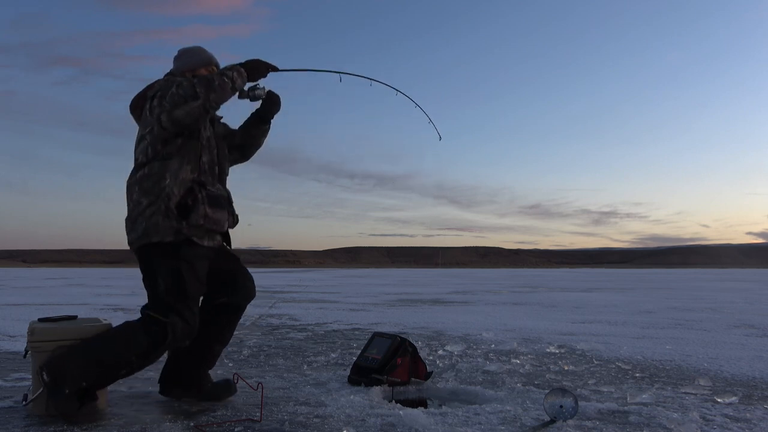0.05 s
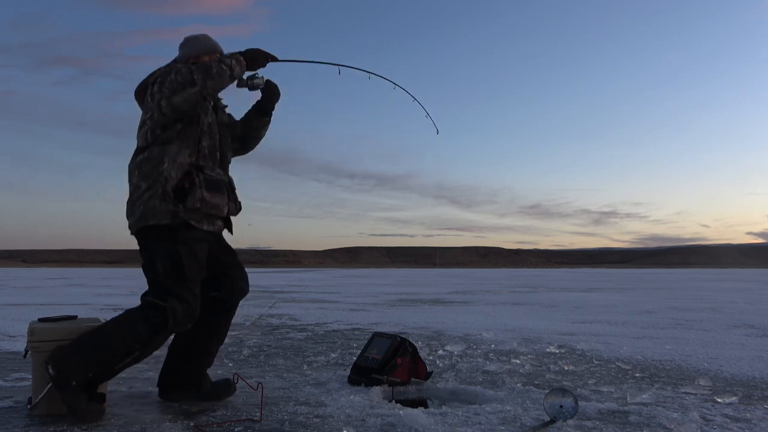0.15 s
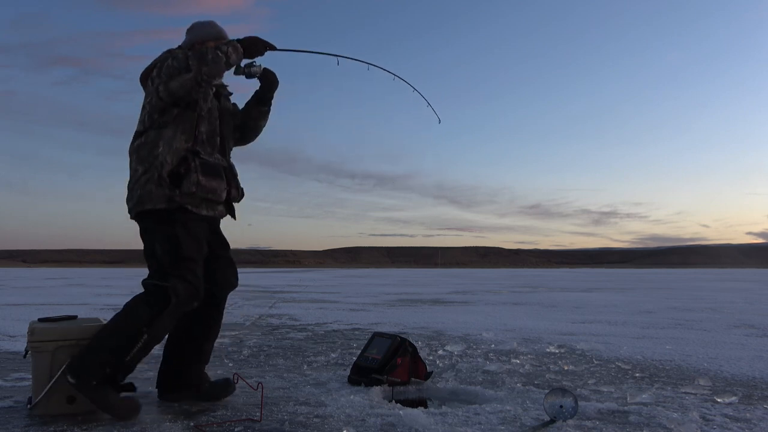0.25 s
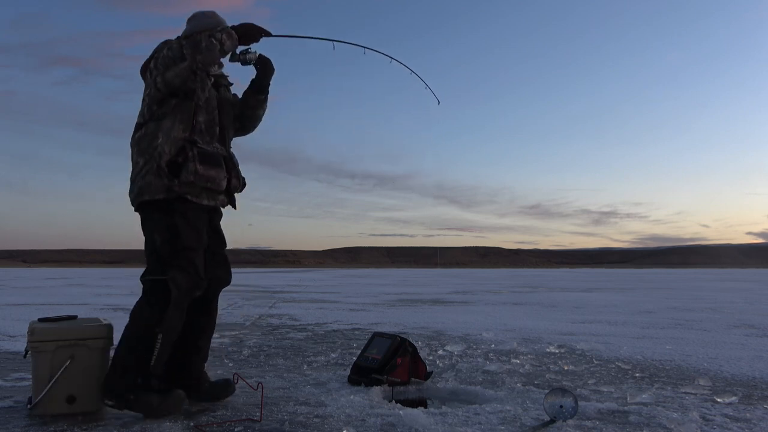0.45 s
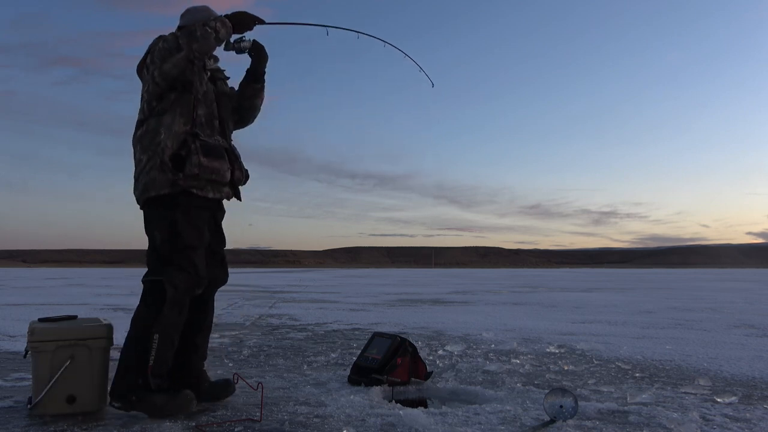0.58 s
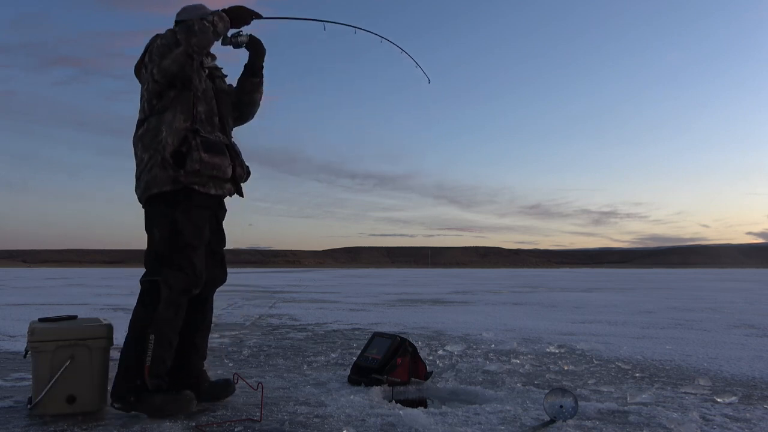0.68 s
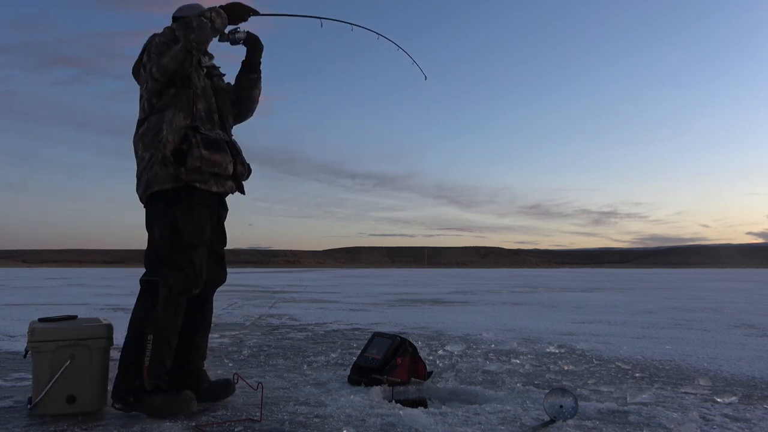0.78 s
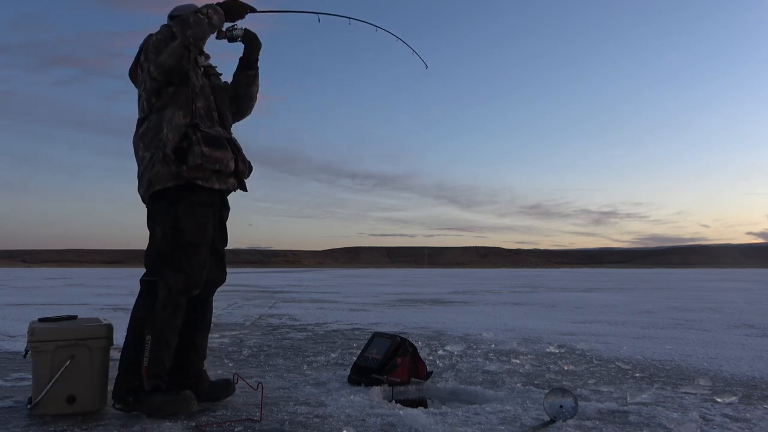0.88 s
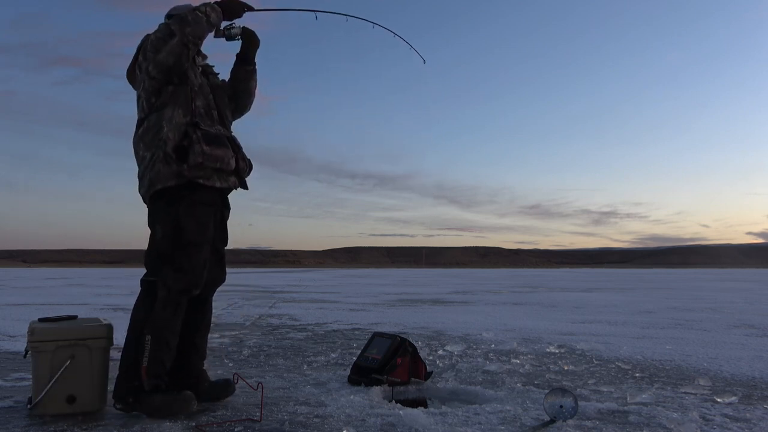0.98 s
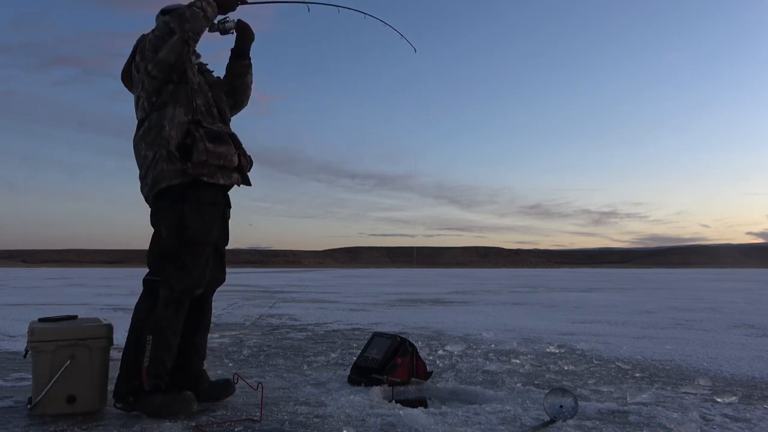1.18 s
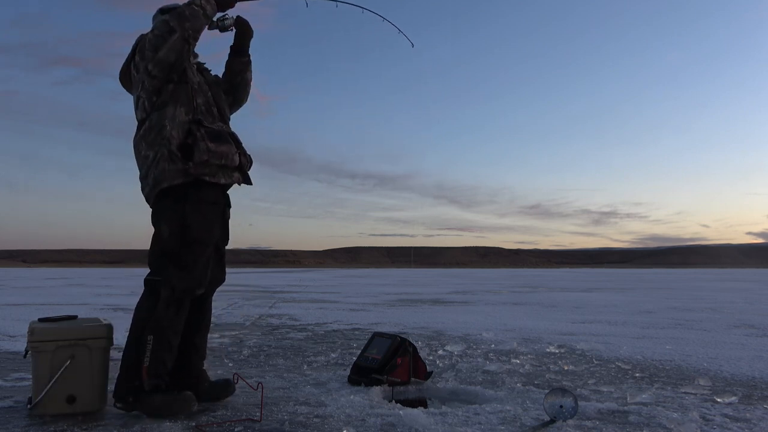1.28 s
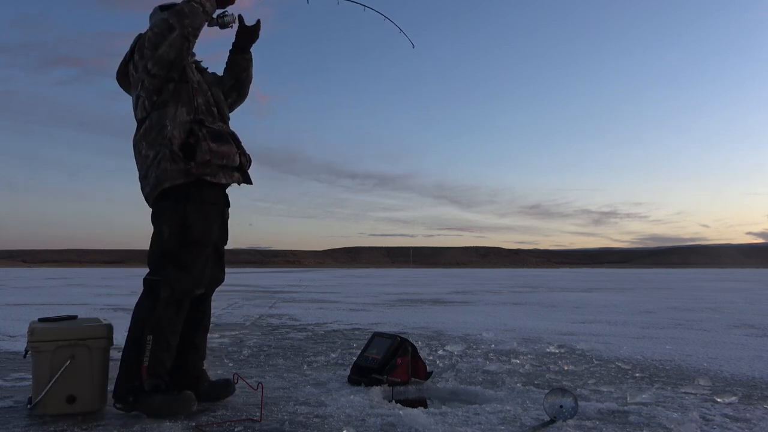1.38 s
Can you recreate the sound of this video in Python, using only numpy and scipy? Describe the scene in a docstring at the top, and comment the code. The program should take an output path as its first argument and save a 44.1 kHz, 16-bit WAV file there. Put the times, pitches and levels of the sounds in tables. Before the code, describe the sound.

Two quick boot knocks hit ice and a hollow plastic bucket as someone stands up on a frozen lake. The sole scrapes and ice crumbs snap, then the rustle of heavy clothes fades, leaving faint tackle ticks and low wind.

```python
"""Low wind and a far drone lie over a frozen lake. An angler in heavy clothes stands up: his boot drags
in quick slips, then knocks twice, on the ice and on a hollow plastic bucket that rings and judders after
each knock. A faint low boom swells from the first knock and dies slowly. The boot scuffs into place and
ice crumbs snap; clothing rustles, and the tackle ticks and squeaks faintly as the rubbing fades."""
import sys
import numpy as np
from scipy import signal
from scipy.fft import rfft, irfft
from scipy.io import wavfile
from scipy.ndimage import uniform_filter1d

SR = 44100
rng = np.random.default_rng(int(sys.argv[2]) if len(sys.argv) > 2 else 0)


def wav_out(sig):
    """Save sig, one row per channel (or a flat mono array), as 16-bit PCM at SR to the path in sys.argv[1]."""
    wavfile.write(sys.argv[1], SR, np.round(np.clip(np.atleast_2d(sig).T, -1, 1) * 32767).astype(np.int16))


N = 63945
T = np.arange(N) / SR

# wind spectrum (frequency [Hz], density [dB])
WIND_SPECTRUM = [(20, 0.5), (40, 4), (130, -2), (230, -6.5), (400, -9), (600, -9.5), (950, -14.5),
                 (1300, -15.5), (2200, -26.5), (4500, -28), (6000, -33), (16000, -39)]
# far drone (centre [Hz], half-width [Hz], level [dB])
DRONE_BANDS = [(113, 15.4, -46.5), (150, 25, -45.5), (580, 57, -44.5), (876, 35, -49.5)]
# metallic ticks of the tackle (time [s], level [dB], pitch [Hz])
TACKLE_TICKS = [(.247, -47.5, 4650), (0.266, -44, 4690), (.596, -40, 4620), (0.656, -49, 4450),
                (0.933, -43, 4350), (1.1295, -42.5, 4420), (1.402, -44, 4400)]
# squeaks of the tackle (time [s], level [dB], length [s])
TACKLE_SQUEAKS = [(0.575, -51, 0.012), (.936, -51, .013), (0.966, -52, 0.011), (1.005, -48, 0.0055)]
# sole and cloth rubbing (time [s], level [dB])
SCUFF_ENVELOPE = [(0, -41.5), (.09, -42), (.125, -35.5), (.26, -33.5), (.31, -30.5), (.39, -31.5),
                  (.5, -31), (.55, -37.5), (.6, -48.5), (.72, -47.5), (.85, -55.5), (1.03, -49),
                  (1.15, -68), (1.45, -50.5)]
# sole and cloth rubbing (frequency [Hz], density [dB])
SCUFF_SPECTRUM = [(100, -5.5), (250, 2.5), (330, 3), (700, 1), (1500, -1.5), (2400, -2.5), (2900, -9.5),
                  (4100, -9.5), (5700, -29.5), (8300, -22.5), (11000, -33.5), (16000, -49)]
# hiss of frost and stiff fabric (time [s], level [dB])
HISS_ENVELOPE = [(0, -49), (.12, -46.5), (.25, -55), (.318, -60), (.328, -41), (.385, -36), (.42, -41.5),
                 (.47, -38.5), (.6, -58.5), (.8, -56), (.88, -71), (1.22, -62), (1.265, -54.5),
                 (1.305, -53), (1.34, -69), (1.45, -55)]
# hiss of frost and stiff fabric (frequency [Hz], density [dB])
HISS_SPECTRUM = [(1500, 5.5), (4200, 9.5), (5800, -2.5), (7200, 2.5), (8500, 0), (10500, -5), (13000, -12),
                 (16000, -21)]
# ice crumbs under the sole (time [s], crunch [dB], fizz [dB])
CRUMB_SNAPS = [(0.1036, -8.5, -17), (.205, -8.5, -28), (0.3709, -3.5, -16), (0.4694, -5, -30),
               (0.4722, -5.5, -19), (0.4782, -14, -16), (0.787, -23.5, -52), (1.0552, -16, -42),
               (1.083, -25, -49)]
# boot and bucket rocking and settling (time [s], level [dB], pitch [Hz])
ROCKING_THUDS = [(0.2095, -9, 530), (0.2138, -6.5, 466), (0.2239, -6, 441), (0.2351, -9, 446),
                 (0.2435, -16, 474), (0.2802, -29.5, 414), (0.2928, 0, 461), (0.3016, -9.5, 470),
                 (0.3102, -3.5, 370), (0.319, -9.5, 310), (0.3305, -13.5, 406), (0.3368, -7, 419),
                 (0.3495, -8.5, 422), (0.408, -20, 400), (0.4225, -23, 432), (0.784, -35, 414),
                 (1.0281, -30, 333)]
# bucket modes (frequency [Hz], level [dB], t60 [s])
BUCKET_MODES = [(313, -7, 0.27), (332.1, 1, 0.28), (424.2, 2.5, 0.26), (458.4, -1, 0.39), (495, -3, 0.3),
                (673.3, 4, 0.12), (806.7, -1, 0.24), (1076, -7, 0.14), (1320, -13, 0.31),
                (1448, 0.5, 0.043), (1970, -37, 0.077), (2260, -24, 0.059)]
# hard contact of the boot (frequency [Hz], density [dB])
CRACK_SPECTRUM = [(150, -61), (500, -36), (650, 2), (1050, 4.5), (1260, -9), (1500, 1.5), (1680, -8),
                  (2100, -2.5), (2600, -5), (2820, -32), (3200, -7.5), (3650, -22.5), (4200, -8.5),
                  (4550, -34), (4900, -12), (6100, -32.5), (8300, -17.5), (10200, -32), (16000, -59)]
# knocks and rebounds (time [s], crack [dB], ring [dB], clatter [dB], clatter t60 [s], crack cutoff [Hz])
BOOT_KNOCKS = [(0.212, 12.5, -22, 9, 0.025, 17000), (0.2177, -12, -28, 9, 0.044, 7600),
               (.2958, 4.5, -17, 12.5, 0.047, 8900), (0.3165, 1.5, -33.5, -1, 0.032, 3360),
               (.339, 1, -29.5, -15.5, 0.16, 2470)]


def amp(db):
    """Decibels to gain."""
    return 10 ** (np.asarray(db) / 20)


def unit(x):
    """Scales to rms 1."""
    return x / np.sqrt(np.mean(x ** 2) + 1e-20)


def colour(spectrum, hz):
    """Gain of a spectrum table at hz."""
    table_hz, db = np.transpose(spectrum)
    return amp(np.interp(np.log(hz + 1), np.log(table_hz + 1), db))


def level(envelope):
    """Gain of an envelope table per sample."""
    return amp(np.interp(T, *np.transpose(envelope)))


def add(mix, time_s, sound):
    """Mixes a sound in at time_s."""
    part = mix[max(round(time_s * SR), 0):][:len(sound)]
    part += sound[:len(part)]


def cut(x, hz, kind="low", order=2):
    """Butterworth low-pass or high-pass."""
    return signal.sosfilt(signal.butter(order, hz, kind, fs=SR, output="sos"), x)


def band(centre_hz, half_width_hz):
    """Narrow-band noise, rms 1."""
    hz = np.fft.rfftfreq(N, 1 / SR)
    return unit(irfft(rfft(rng.standard_normal(N)) / (1 + ((hz - centre_hz) / half_width_hz) ** 2), N))


def click(spectrum, size=2048):
    """Minimum-phase click, energy 1."""
    log_gain = np.log(colour(spectrum, abs(np.fft.fftfreq(size, 1 / SR))))
    pulse = np.fft.ifft(np.exp(np.conj(signal.hilbert(log_gain)))).real
    return pulse / np.linalg.norm(pulse)


def burst(t60_s, size=8192):
    """Decaying noise, energy 1."""
    x = rng.standard_normal(size) * np.exp(-np.log(1000) * T[:size] / t60_s)
    return x / np.linalg.norm(x)


def friction(spectrum, grains_per_s=1400, grain_share=.36, spread_db=2, patch_db=3, flicker_db=.5):
    """Tiny slips over fine noise, coloured, with drifting spectral patches; rms 1."""
    grains = rng.standard_normal(N) * (rng.random(N) < grains_per_s / SR)
    grains *= amp(spread_db * np.minimum(rng.exponential(1, N), 3))
    rub = np.sqrt(grain_share) * unit(grains) + np.sqrt(1 - grain_share) * rng.standard_normal(N)
    hz, _, frames = signal.stft(rub, SR, nperseg=256)
    patches = uniform_filter1d(rng.standard_normal(frames.shape), size=8, axis=0)
    patches = unit(uniform_filter1d(patches, size=3, axis=1))
    flicker = rng.standard_normal(frames.shape[1])
    frames *= colour(spectrum, hz)[:, None] * amp(patch_db * patches - flicker_db * flicker)
    return unit(signal.istft(frames, SR, nperseg=256)[1][:N])


def wind(level_db=-42):
    """Low wind over the lake: steady coloured noise."""
    gain = colour(WIND_SPECTRUM, np.fft.rfftfreq(N, 1 / SR))
    return amp(level_db) * unit(irfft(rfft(rng.standard_normal(N)) * gain, N))


def drone():
    """Far drone: fuzzy noise bands."""
    return sum(amp(db) * band(hz, half_width_hz) for hz, half_width_hz, db in DRONE_BANDS)


def boom(level_db=-35, rise_s=.029, t60_s=2.73):
    """A faint low boom swells from the first knock and dies slowly."""
    age_s = np.maximum(T - BOOT_KNOCKS[0][0], 0)
    envelope = amp(level_db - 60 * age_s / t60_s) * np.minimum(age_s / rise_s, 1)
    return envelope * band(centre_hz=177.7, half_width_hz=24.7)


def tackle(rise_s=.0015, glide_depth=.07, settle_s=.0015, squeak_hz=6580, ramp_s=.002):
    """Metal tackle ticks in rough upward chirps and gives brief, cleaner squeaks."""
    out, t = np.zeros(N), T[:SR // 50]
    envelope = np.sqrt(t / rise_s) * np.exp((1 - t / rise_s) / 2)
    glide = 1 - glide_depth * np.exp(-t / settle_s)
    for time_s, db, hz in TACKLE_TICKS:
        chirp = np.sin(2 * np.pi * np.cumsum(hz * glide) / SR)
        roughness = .55 * band(hz, half_width_hz=300)[:len(t)]
        add(out, time_s, amp(db) * envelope * (chirp + roughness))
    for time_s, db, length_s in TACKLE_SQUEAKS:
        gate = np.clip(np.minimum(t, length_s - t) / ramp_s, 0, 1)
        roughness = .2 * band(squeak_hz, half_width_hz=200)[:len(t)]
        add(out, time_s, amp(db) * gate * (np.sin(2 * np.pi * squeak_hz * t) + roughness))
    return out


def scuffing():
    """Sole and clothing rub; ice crumbs snap."""
    out = level(SCUFF_ENVELOPE) * friction(SCUFF_SPECTRUM)
    out += level(HISS_ENVELOPE) * friction(HISS_SPECTRUM)
    crunch, fizz = click(SCUFF_SPECTRUM), click(HISS_SPECTRUM)
    for time_s, crunch_db, fizz_db in CRUMB_SNAPS:
        snap = amp(crunch_db) * crunch + amp(fizz_db) * fizz
        add(out, time_s, signal.fftconvolve(burst(t60_s=.012), snap))
    return out


def dragging(length_s=.15, slips_per_s=72, jitter=.2, gain_db=-11, spread_db=2):
    """The boot drags over the ice in quick, uneven slips."""
    out, slip = np.zeros(N), cut(click(SCUFF_SPECTRUM), hz=2600, order=4)
    for k, (offset, strength) in enumerate(rng.standard_normal((int(length_s * slips_per_s), 2))):
        add(out, (k + jitter * offset) / slips_per_s, amp(gain_db + spread_db * strength) * slip)
    return out


def thuds(rise_s=.0034):
    """Soft contacts push the hollow bucket for a few cycles each."""
    out, t = np.zeros(N), T[:SR // 10]
    swell = (t / rise_s * np.exp(1 - t / rise_s)) ** 2
    for time_s, db, hz in ROCKING_THUDS:
        add(out, time_s, amp(db) * swell * np.sin(2 * np.pi * hz * t))
    return out


def knocks(grit_rise_s=.00068, grit_db=-6, clatter_low_hz=584, crossover_hz=2270):
    """Each blow of the boot: gritty crack, ringing bucket modes, short clatter."""
    out, contact = np.zeros(N), click(CRACK_SPECTRUM)
    grit_age = T[:SR // 100] / grit_rise_s
    ring = sum(amp(db) * np.exp(-np.log(1000) * T / t60_s) * np.sin(2 * np.pi * hz * T)
               for hz, db, t60_s in BUCKET_MODES)
    rattle = cut(cut(contact, clatter_low_hz, "high", order=4), crossover_hz)
    for time_s, crack_db, ring_db, clatter_db, clatter_t60_s, cutoff_hz in BOOT_KNOCKS:
        grit = cut(rng.standard_normal(len(grit_age)) * grit_age * np.exp(-grit_age), crossover_hz, "high")
        blow = signal.unit_impulse(len(grit)) + amp(grit_db) * grit / np.linalg.norm(grit)
        crack = cut(signal.fftconvolve(blow, contact), cutoff_hz, order=4)
        add(out, time_s, amp(crack_db) * crack)
        add(out, time_s, amp(ring_db) * ring)
        add(out, time_s, amp(clatter_db) * signal.fftconvolve(burst(clatter_t60_s), rattle))
    return out


def scene():
    """All sources in open air, mono."""
    impacts = cut(knocks() + thuds(), hz=285, kind="high", order=10)
    return (impacts + boom() + dragging() + scuffing() + tackle() + wind() + drone())[None]


def record(dry, cutoff_hz=15800):
    """Soft overload of the peaks, then a low-pass."""
    clipped = dry / (1 + dry ** 6) ** (1 / 6)
    low_pass = signal.firwin(1023, cutoff_hz, window=("kaiser", 9), fs=SR)
    return signal.oaconvolve(clipped, low_pass[None], "same")


dry = scene()
out = record(dry)
wav_out(out)
```